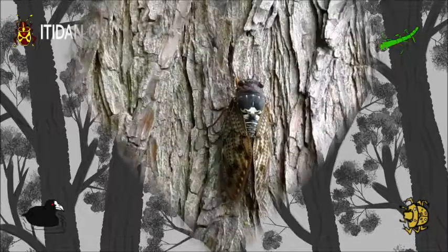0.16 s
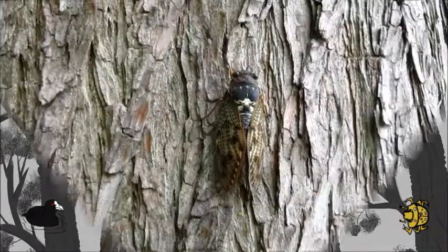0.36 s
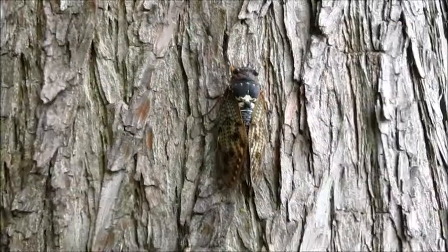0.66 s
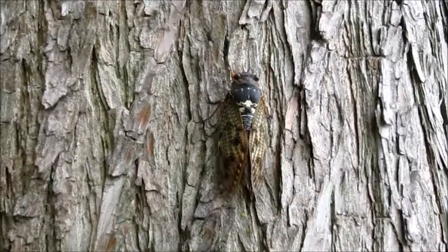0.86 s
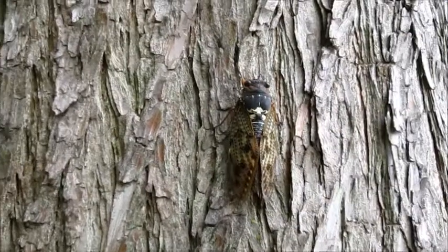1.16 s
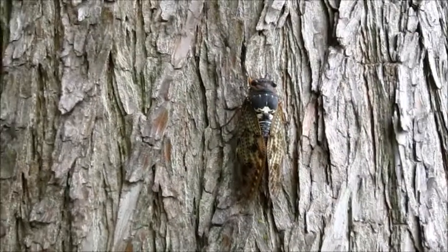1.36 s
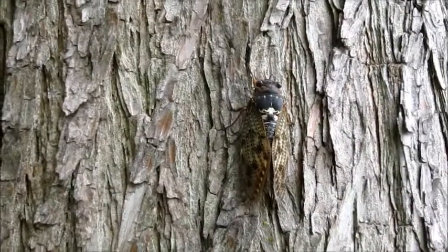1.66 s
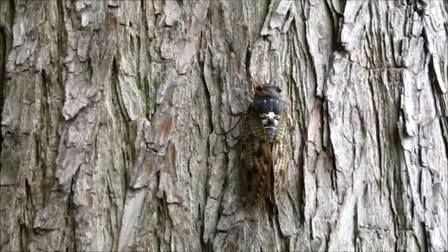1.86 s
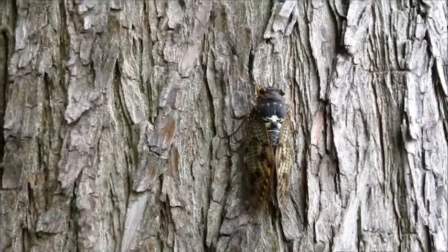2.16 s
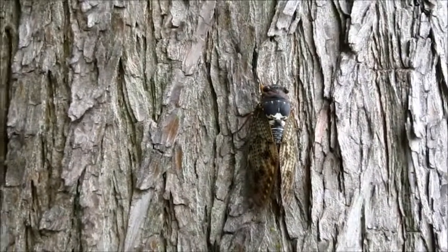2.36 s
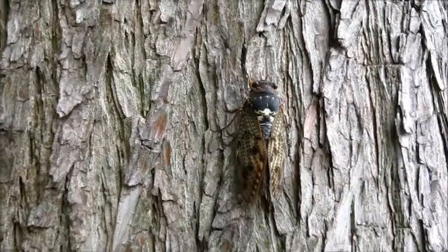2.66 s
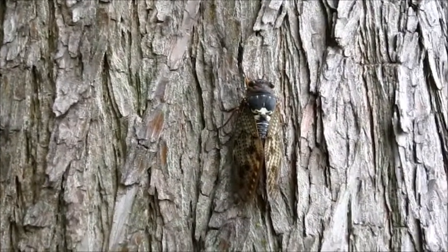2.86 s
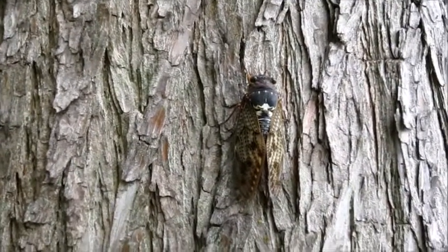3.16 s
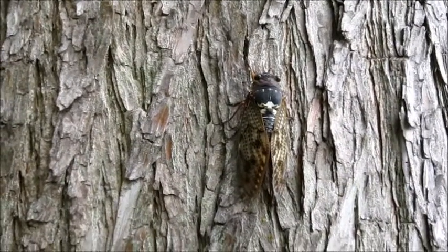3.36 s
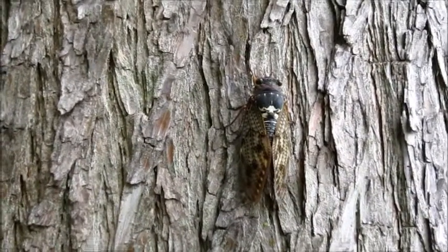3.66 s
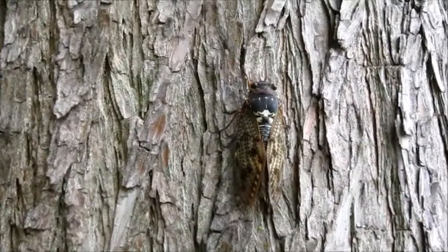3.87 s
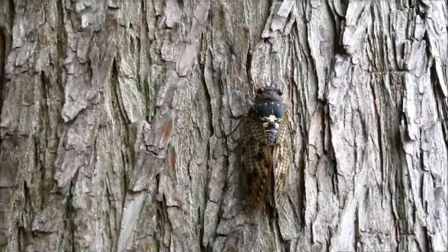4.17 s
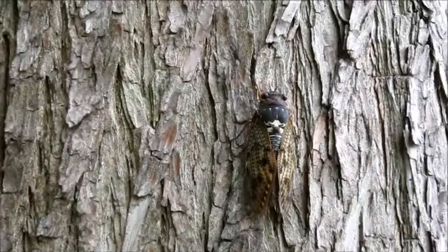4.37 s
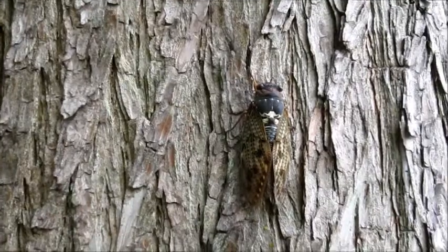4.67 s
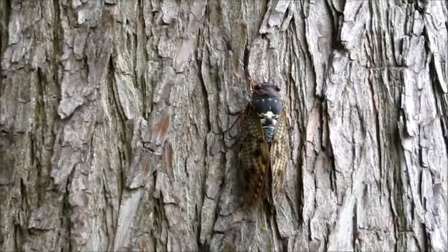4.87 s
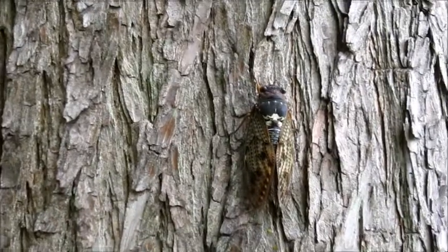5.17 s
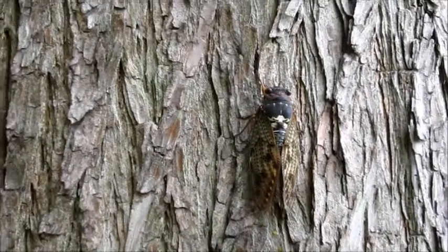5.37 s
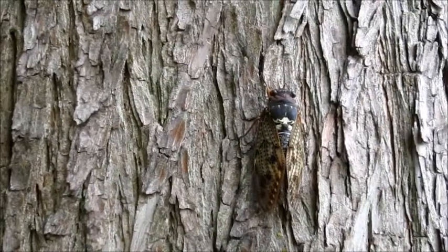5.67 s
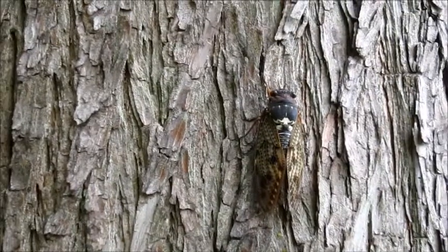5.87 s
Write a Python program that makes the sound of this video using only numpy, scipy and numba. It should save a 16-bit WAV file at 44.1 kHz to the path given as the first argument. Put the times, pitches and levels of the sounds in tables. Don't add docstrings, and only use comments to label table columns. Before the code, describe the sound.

A very soft dull tap on the microphone comes early as cicada song rises out of quiet. A bright, rapidly fluttering buzz sits close, over a second singer's quick see-sawing low and high rasp, steady neighbours and a broad far hiss. Past halfway another thin shrill buzz enters. Distant road noise stays low underneath. The sound is airy, with short scattering from trunks and leaves, and sinks away toward the end.

```python
import sys
import numpy as np
from scipy import signal
from scipy.fft import rfft, irfft
from scipy.io import wavfile
from scipy.ndimage import uniform_filter1d
from numba import njit

SR = 44100
rng = np.random.default_rng(int(sys.argv[2]) if len(sys.argv) > 2 else 0)


def amplitude_ratio(level_db):
    exponent = np.asarray(level_db, float) / 20
    return 10 ** exponent


def materialize(psi):
    bounded = np.clip(np.atleast_2d(psi).T, -1, 1)
    quanta = np.round(bounded * 32767).astype(np.int16)
    wavfile.write(sys.argv[1], SR, quanta)


N = 266099


def level(x, db):
    return x * amplitude_ratio(db) / np.sqrt(np.mean(x ** 2))


def between(ends, share):
    return ends[0] + (ends[1] - ends[0]) * share


def swell(at, start, attack, hold, release):
    corners = start + np.cumsum([0, attack, hold, release])
    return np.interp(at, corners, [0, 1, 1, 0])


def walk(rate):
    k = int(SR / rate)
    held = np.repeat(rng.standard_normal(N // 200)[:N // k + 1], k)
    smooth = uniform_filter1d(uniform_filter1d(held, k), k)[:N]
    return smooth / smooth.std()


@njit
def svf(x, hz, width):
    y, band, low = np.empty(len(x)), 0., 0.
    for i in range(len(x)):
        g = np.tan(np.pi * hz[i] / SR)
        k = width / hz[i]
        v = (band + g * (x[i] - low)) / (1 + g * (g + k))
        band = 2 * v - band
        low = low + 2 * g * v
        y[i] = k * v
    return y


def ring(x, hz, width_hz):
    hz = np.clip(hz, 20, .45 * SR) * np.ones(N)
    return svf(svf(x, hz, 1. * width_hz), hz, 1. * width_hz)


def clicks(rate_hz, jitter_s, scatter_db, weak_db=0, weak_late_s=0):
    cycles = np.cumsum(rate_hz) / SR
    k = np.arange(1, int(cycles[-1]))
    chance = rng.standard_normal((N // 50, 2))[:len(k)].T
    odd = k % 2
    at = np.interp(k, cycles, np.arange(N)) + SR * (jitter_s * chance[0] + weak_late_s * odd)
    weak_here_db = (weak_db * np.ones(N))[np.clip(at, 0, N - 1).astype(int)]
    size = amplitude_ratio(scatter_db * chance[1] + weak_here_db * odd)
    taps = np.floor(at)[:, None] + np.arange(-7, 9)
    offset = taps - at[:, None]
    shape = np.sinc(offset) * np.cos(np.pi * offset / 16) ** 2
    index = np.clip(taps, 0, N - 1).astype(int)
    return np.bincount(index.ravel(), (size[:, None] * shape).ravel(), N)


def colour(spectrum, swell_db, flicker_db, flicker_rate):
    log_hz, db = np.log(np.transpose(spectrum)[0]), np.transpose(spectrum)[1]
    f = np.log(np.fft.rfftfreq(N, 1 / SR) + 1)
    shaped = rfft(rng.standard_normal(N)) * amplitude_ratio(np.interp(f, log_hz, db, left=-90))
    common_db = swell_db * walk(.8)
    third_octave = np.log(2) / 3
    out = 0
    for centre in np.arange(log_hz[0], min(log_hz[-1] + 1, np.log(SR / 2)), third_octave):
        share = np.clip(1 - abs(f - centre) / third_octave, 0, 1)
        out = out + amplitude_ratio(common_db + flicker_db * walk(flicker_rate)) * irfft(shaped * share, N)
    return out


def leaves(x, t60_s, wet_db):
    t = np.arange(int(.4 * SR)) / SR
    tail = rng.standard_normal(len(t)) * np.exp(-np.log(1000) * t / t60_s)
    tail = tail / np.sqrt(np.sum(tail ** 2))
    return x + amplitude_ratio(wet_db) * signal.fftconvolve(x, tail)[:N]


def far_chorus():
    # (frequency [Hz], density [dB/Hz])
    chorus = [(1800, -35), (2300, -24.5), (3000, -17.5), (3800, -20.5), (4500, -12), (5200, -4),
              (5800, -0.7), (6500, -0.4), (7300, 0.5), (8500, -7), (9700, -20.5), (11500, -14),
              (13500, -16), (15500, -15.5)]
    return level(colour(chorus, swell_db=1.12, flicker_db=0.36, flicker_rate=11), 3.55)


def near_cicada(t):
    # (time [s], pumping [strokes/s])
    pumping = [
        (0, 14.98),
        (1.25, 15.21),
        (2.5, 14.9),
        (3.75, 15.13),
        (4.5, 14.77),
        (5.25, 15.08),
    ]
    since, pace = np.transpose(pumping)
    pace_now = pace[np.searchsorted(since, t, "right") - 1]
    strokes = .07 + np.cumsum(pace_now) / SR + .015 * walk(12)
    taut = 1 - swell(strokes % 1, start=0, attack=.15, hold=.2, release=.28)
    low_hz, high_hz = between((5850, 8100), taut), between((11600, 14900), taut)
    weak_db = between((-2, -6.5), taut)
    low_db = between((2, -4), taut) - 5.5 * np.sin(np.pi * taut)
    high_db = between((-8.5, -.5), taut ** 1.5)
    pair_hz = 184.1 + .85 * t
    tymbal = clicks(2 * pair_hz, jitter_s=.00008, scatter_db=1.3, weak_db=weak_db, weak_late_s=.0002)
    low = level(ring(tymbal, low_hz, width_hz=1100), -4.5) * amplitude_ratio(low_db)
    high = level(ring(tymbal, high_hz, width_hz=3900), -8) * amplitude_ratio(high_db + .8 * walk(15))
    return leaves(low + high, t60_s=.04, wet_db=-6)


def second_cicada(t):
    # (centre [Hz], width [Hz], level [dB])
    low_voice = [
        (2130, 160, -13),
        (2385, 200, 0),
        (2700, 350, -2.5),
        (3080, 450, 0),
        (3460, 300, -.5),
    ]
    share = (.47 + 5.515 * t + .035 * t ** 2 / 2) % 1
    low_half = swell(share, start=0, attack=.11, hold=.35, release=.14)
    high_half = swell(share, start=.43, attack=.3, hold=.17, release=.1)
    low_rate_hz = 349 - 42 * np.exp(-share / .2)
    rate_hz = between((low_rate_hz, 444), np.sqrt(high_half)) * (1 + .006 * walk(9))
    high_hz = between((3750, 4600), high_half)
    silent_db = -22
    low_db, high_db = silent_db * (1 - low_half), silent_db * (1 - high_half)
    buzz = clicks(rate_hz, jitter_s=.00002, scatter_db=1.3)
    rasp = clicks(rate_hz, jitter_s=.00004, scatter_db=2.5)
    low = 0
    for k, (hz, width_hz, db) in enumerate(low_voice):
        low = low + (-1) ** k * amplitude_ratio(db + 1.2 * walk(7)) * ring(buzz, hz, width_hz)
    high = level(ring(rasp, high_hz, width_hz=760), -13.5)
    high = high + level(ring(rasp, 1.923 * high_hz, width_hz=1350), -12)
    song = level(low, -17.0) * amplitude_ratio(low_db) + high * amplitude_ratio(high_db + 1.6 * walk(6.14))
    return leaves(song * amplitude_ratio(1.9), t60_s=.15, wet_db=-7)


def neighbours():
    # (click rate [Hz], ring [Hz], width [Hz], level [dB])
    singers = [
        (410.3, 5620, 960, -6.5),
        (470.8, 6080, 1100, -6),
    ]
    out = 0
    for rate_hz, hz, width_hz, db in singers:
        tymbal = clicks(rate_hz * (1 + .012 * walk(6)), jitter_s=.00003, scatter_db=2.5)
        song = level(ring(tymbal, hz * (1 + .03 * walk(5)), width_hz), db)
        out = out + song * amplitude_ratio(1.5 * walk(14))
    return leaves(out, t60_s=0.36, wet_db=-6)


def town(t):
    # (frequency [Hz], density [dB/Hz])
    traffic = [(12, -35), (20, -4), (43, 0.5), (107, 1), (178, -8.5), (290, -13.5), (500, -13.5),
               (729, -19), (967, -17), (1240, -20), (1330, -18), (1490, -20), (1800, -22.5), (2340, -34),
               (3960, -120)]
    # (frequency [Hz], level [dB rms])
    lines = [
        (1303, -51),
        (1421, -61),
    ]
    rumble = level(colour(traffic, swell_db=-2.2, flicker_db=0.5, flicker_rate=5.4), -5.0) * amplitude_ratio(-13)
    car_passes_s, car_near_s = 1.66, 1.48
    tyre_db = -21 - 10 * np.log10(1 + ((t - car_passes_s) / car_near_s) ** 4)
    tyres = level(ring(rng.standard_normal(N), 956, width_hz=300), -7.5) * amplitude_ratio(tyre_db)
    whine = 0
    for hz, db in lines:
        strength = amplitude_ratio(db + 20 + 1.2 * walk(4))
        phase = 2 * np.pi * np.cumsum(hz + .7 * walk(5)) / SR
        whine = whine + strength * np.sin(phase)
    return rumble + tyres + whine


def tick(t):
    # (time [s], peak level [dB], frequency [Hz])
    taps = [
        (.3088, -36, 800),
    ]
    out = 0
    for s, db, hz in taps:
        cycle = np.cos(2 * np.pi * hz * (t - s))
        overtone = amplitude_ratio(-14) * np.cos(2 * np.pi * 2.5 * hz * (t - s))
        out = out - amplitude_ratio(db) * np.exp(-((t - s) * hz / 0.64) ** 2) * (cycle + overtone)
    return out


def slips(hz):
    # (time [s], low edge [Hz], high edge [Hz], level [dB])
    bursts = [
        (.723, 5160, 6300, -40),
        (2.929, 6860, 8300, -38),
        (2.929, 10400, 12500, -34),
        (2.929, 13800, 15700, -29),
        (3.463, 8300, 11100, -39),
        (3.463, 13200, 14500, -34),
    ]
    t, noise, out = np.arange(N) / SR, rfft(rng.standard_normal(N)), 0
    for s, low_hz, high_hz, db in bursts:
        window = np.cos(np.pi / 2 * np.clip((t - s) / .021, -1, 1))
        band = irfft(noise * (hz > low_hz) * (hz < high_hz), N)
        out = out + window * level(band, db)
    return out * np.array([[1], [-1]])


def third_cicada(t):
    joins_s, attack_s, settle_s = 3.75, .25, .4
    tymbal = clicks(440 * (1 + .01 * walk(4)), jitter_s=0.00018, scatter_db=-3.5)
    song = level(ring(tymbal, 8500, width_hz=600) + amplitude_ratio(-3) * ring(tymbal, 9050, width_hz=500), 0)
    since = t - joins_s - attack_s
    joins = np.clip(1 + since / attack_s, 0, 1) ** 2
    effort_db = -12.5 + 3.5 * np.exp(-np.maximum(since, 0) / settle_s)
    return leaves(song * joins * amplitude_ratio(effort_db + 1.6 * walk(3.4)), t60_s=0.36, wet_db=-11.0)


def fader(t):
    step_s, offset_s = 1 / 15, .0367
    fade_in_s, fade_out_from_s, fade_out_s = 2.4, 4.8, 2.15
    s = offset_s + step_s * np.round((t - offset_s) / step_s)
    rise = np.clip((s + 0.0075) / fade_in_s, 0, 1) ** 1.2
    fall = np.clip(1 - (s - fade_out_from_s) / fade_out_s, 0, 1)
    open_s = np.clip(s - fade_in_s, 0, fade_out_from_s - fade_in_s)
    return rise * fall * amplitude_ratio(-22.3 - .4 * open_s)


def scene():
    t = np.arange(N) / SR
    chorus = far_chorus()
    cicadas = near_cicada(t) + second_cicada(t) + third_cicada(t) + neighbours()
    trees = cicadas + chorus + town(t)
    return np.tile(trees * fader(t) + tick(t) / 2, (2, 1))


def low_pass(x):
    return signal.sosfilt(signal.butter(12, 16830, fs=SR, output="sos"), x)


def record(dry):
    null_hz, match, top_hz, start_s = 7862, .999, 15730, .0364
    hz = np.fft.rfftfreq(N, 1 / SR)
    ports = 1 + match * np.exp(-1j * np.pi * hz / null_hz)
    summed = irfft(rfft(dry) * ports * (hz < top_hz), N)
    started = np.arange(N) > start_s * SR
    return low_pass(summed * started + slips(hz))


dry = scene()
out = record(dry)
materialize(out)
```